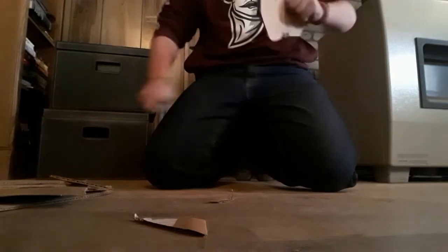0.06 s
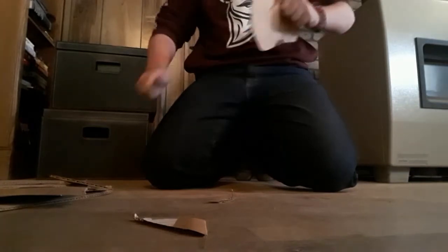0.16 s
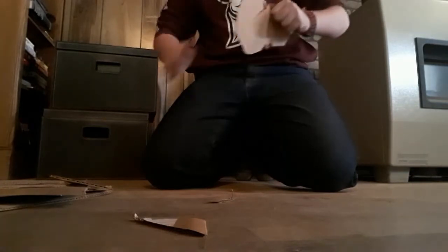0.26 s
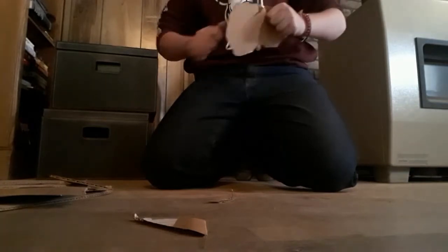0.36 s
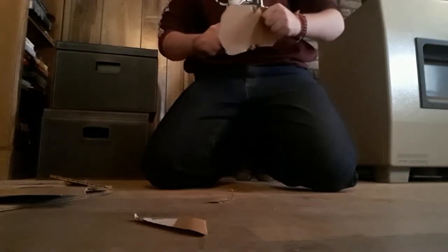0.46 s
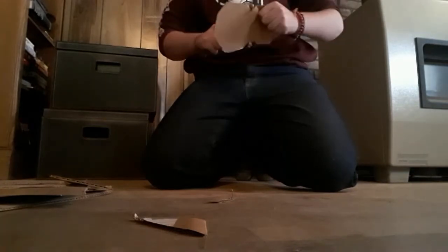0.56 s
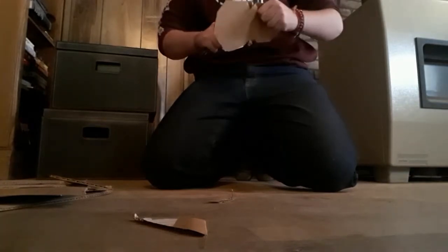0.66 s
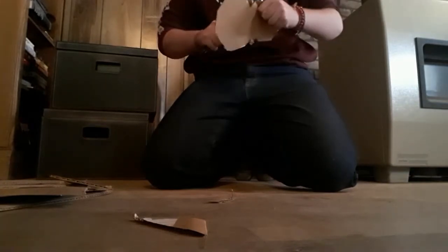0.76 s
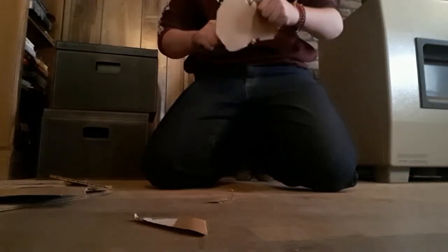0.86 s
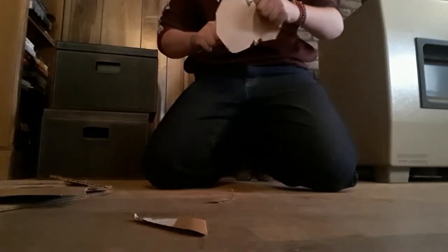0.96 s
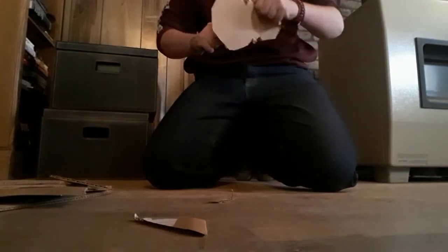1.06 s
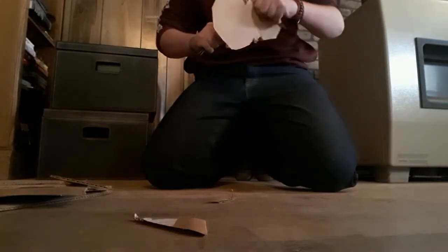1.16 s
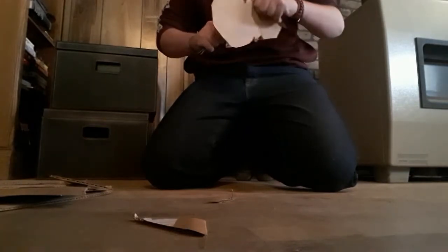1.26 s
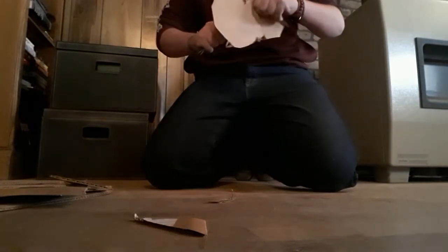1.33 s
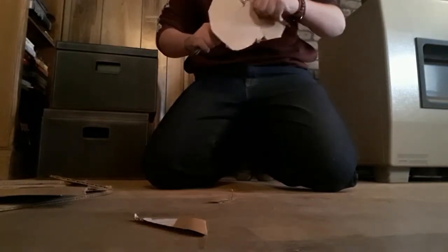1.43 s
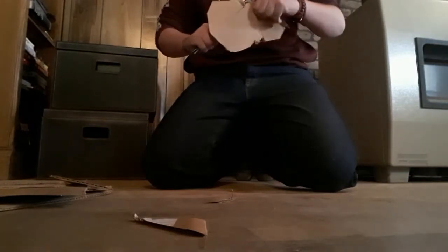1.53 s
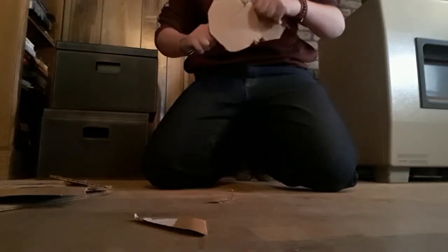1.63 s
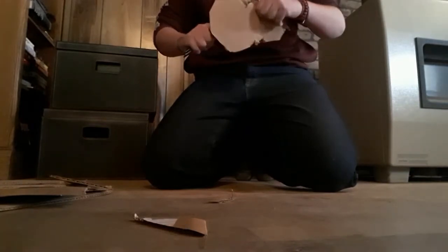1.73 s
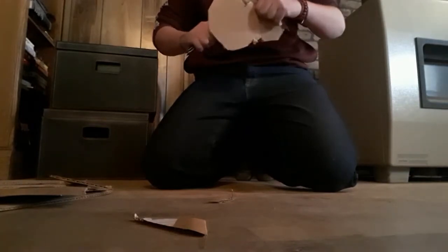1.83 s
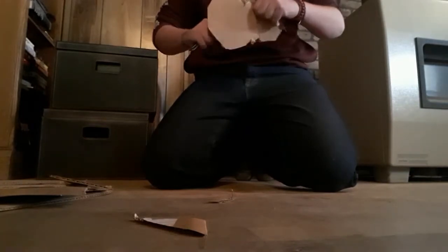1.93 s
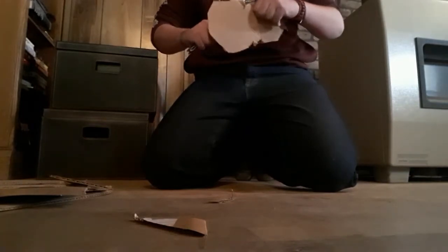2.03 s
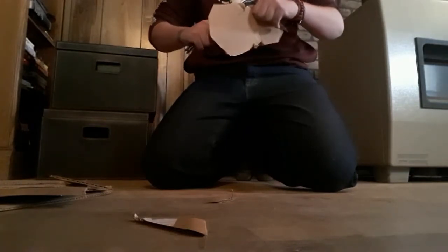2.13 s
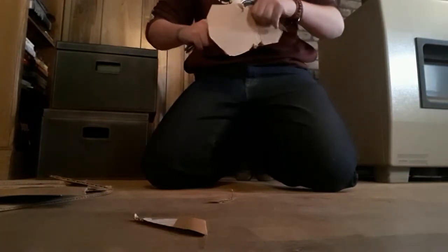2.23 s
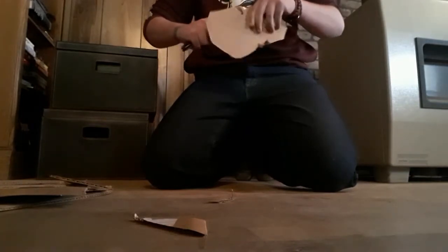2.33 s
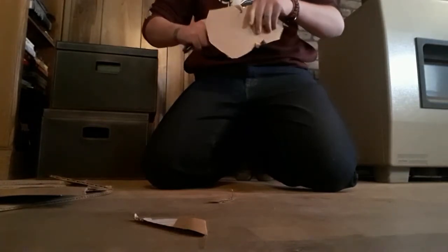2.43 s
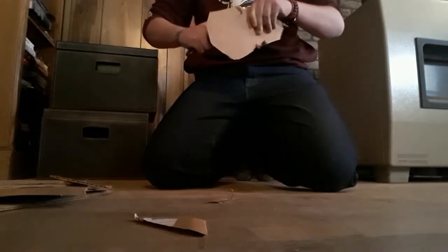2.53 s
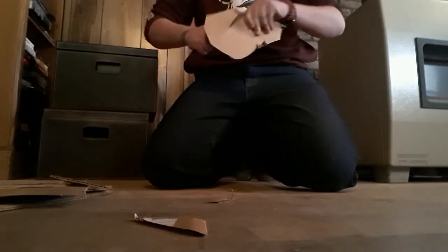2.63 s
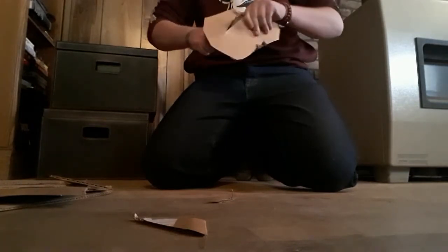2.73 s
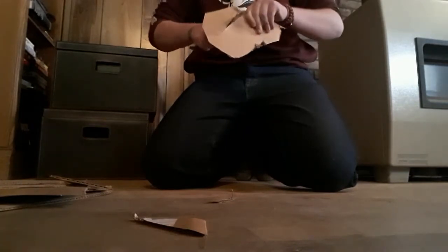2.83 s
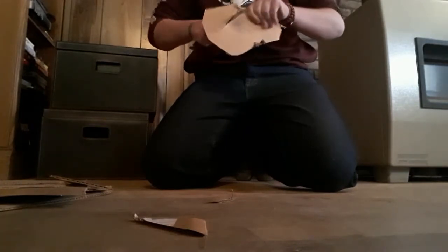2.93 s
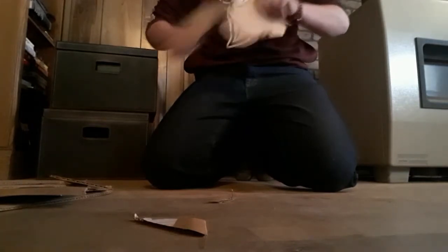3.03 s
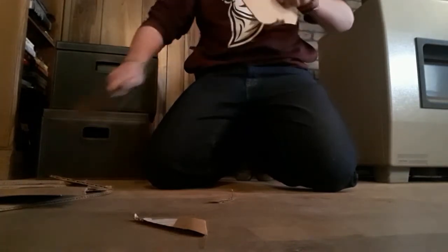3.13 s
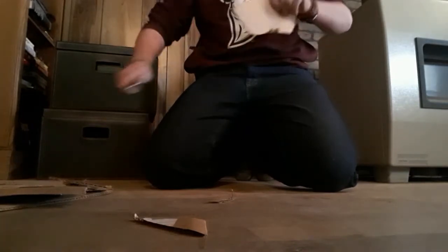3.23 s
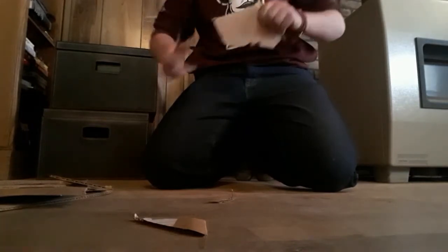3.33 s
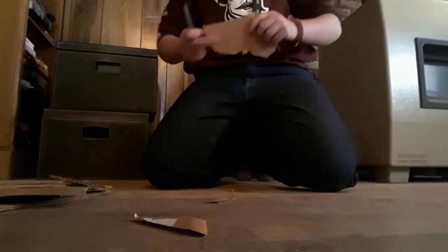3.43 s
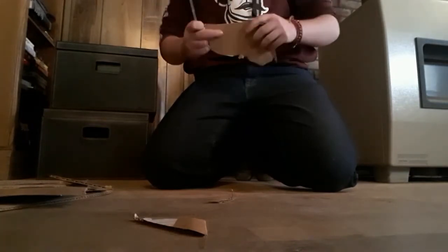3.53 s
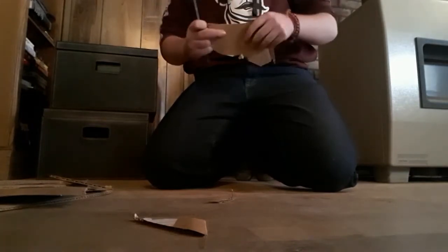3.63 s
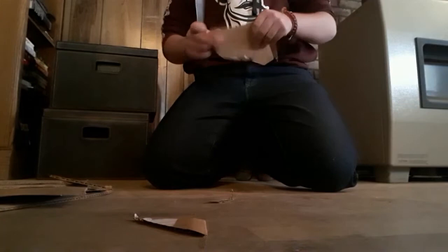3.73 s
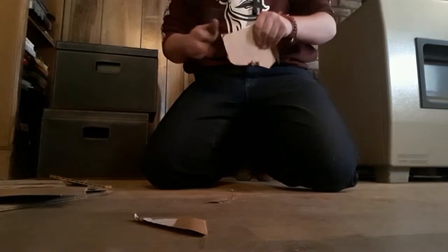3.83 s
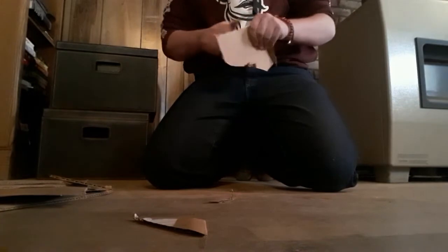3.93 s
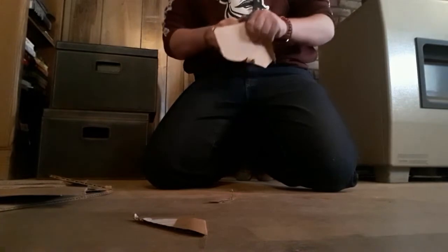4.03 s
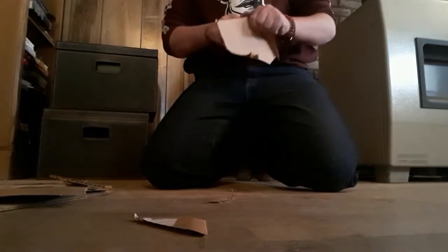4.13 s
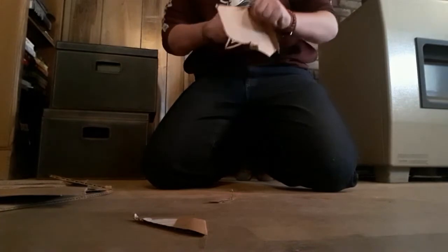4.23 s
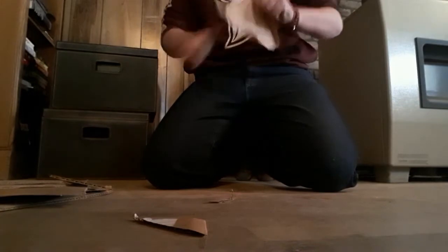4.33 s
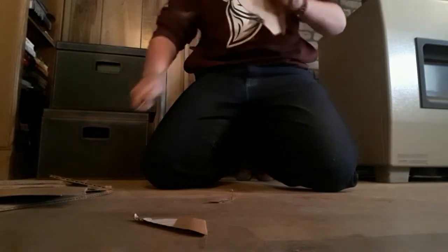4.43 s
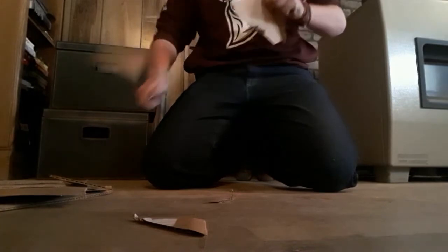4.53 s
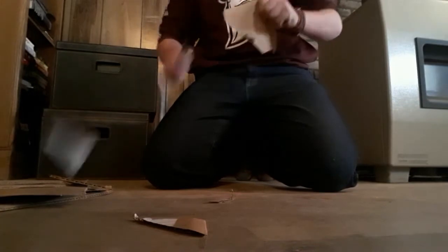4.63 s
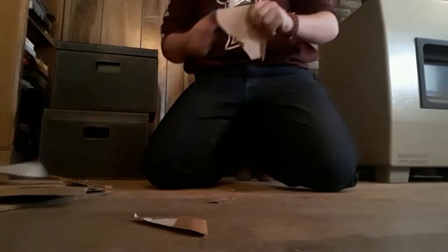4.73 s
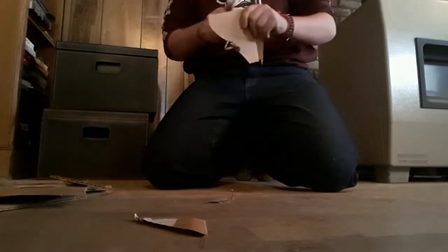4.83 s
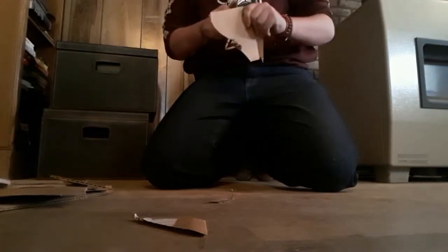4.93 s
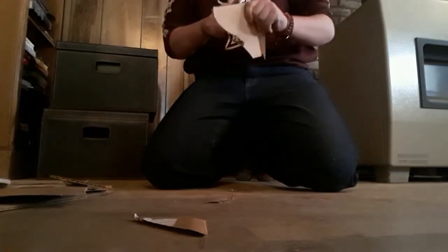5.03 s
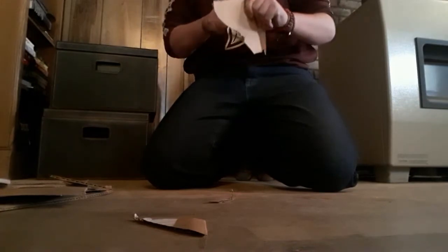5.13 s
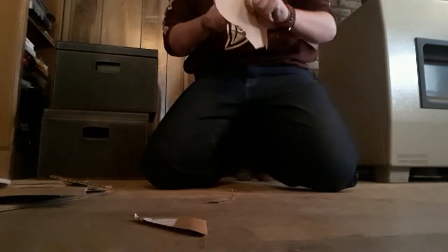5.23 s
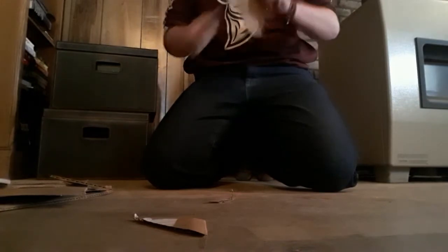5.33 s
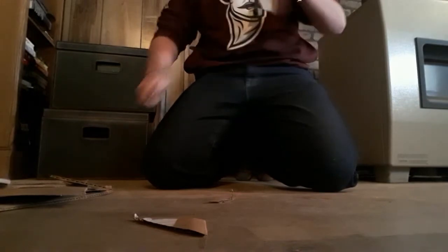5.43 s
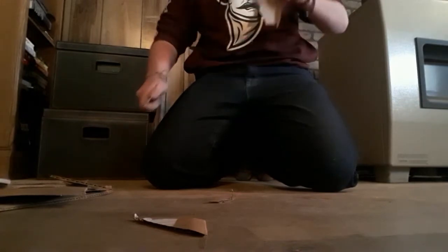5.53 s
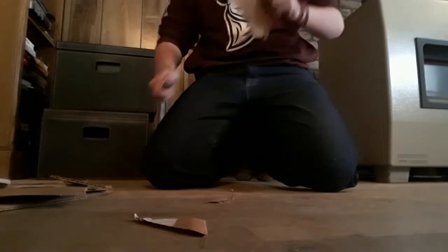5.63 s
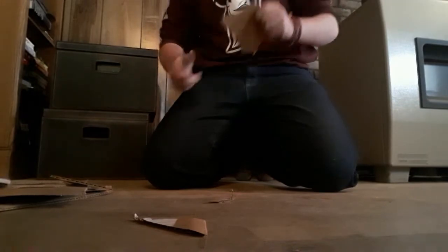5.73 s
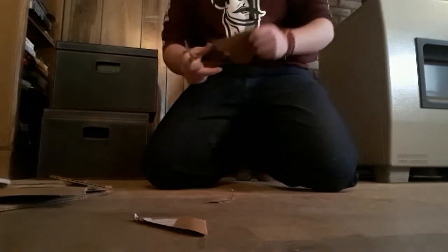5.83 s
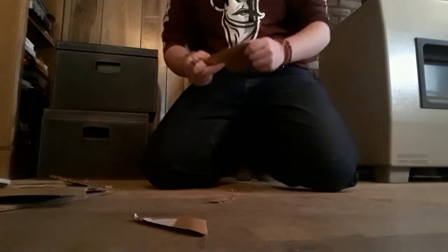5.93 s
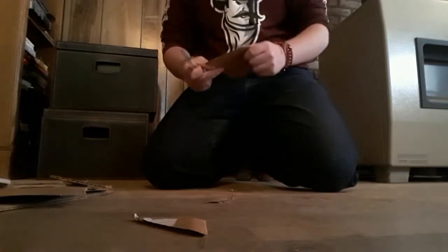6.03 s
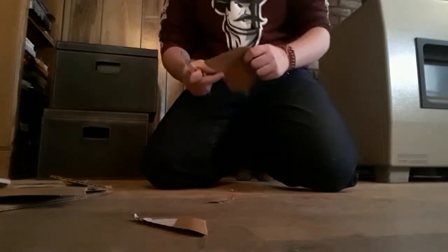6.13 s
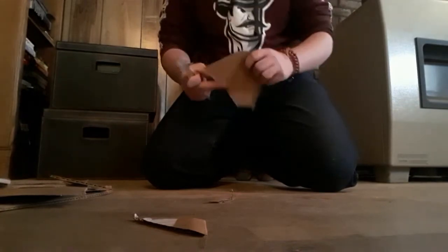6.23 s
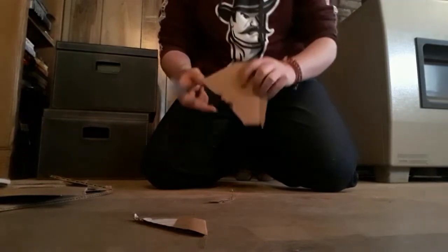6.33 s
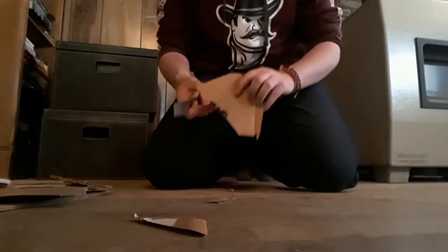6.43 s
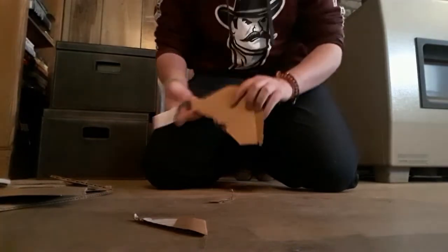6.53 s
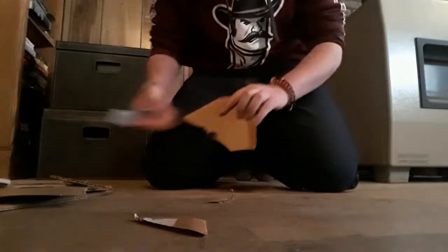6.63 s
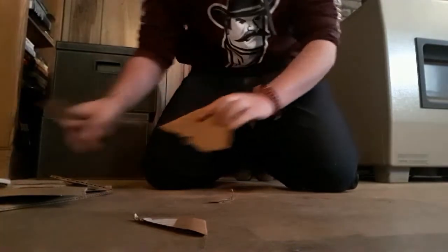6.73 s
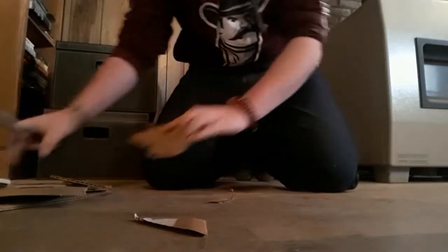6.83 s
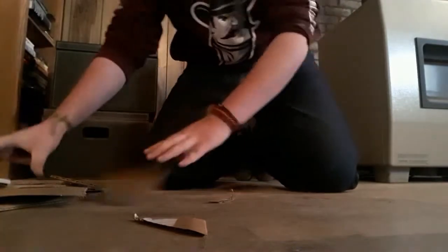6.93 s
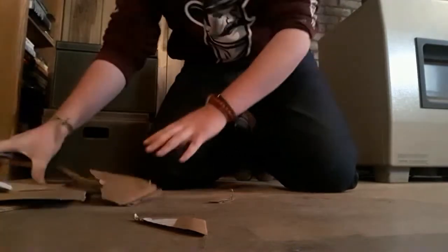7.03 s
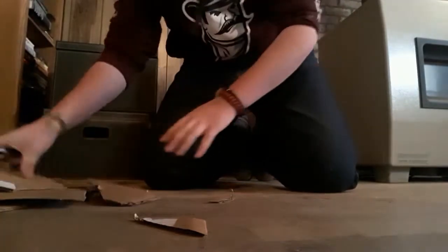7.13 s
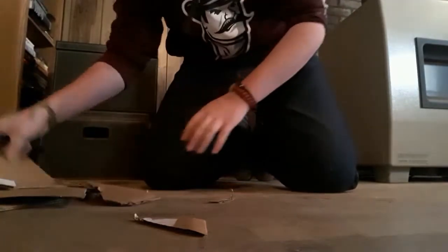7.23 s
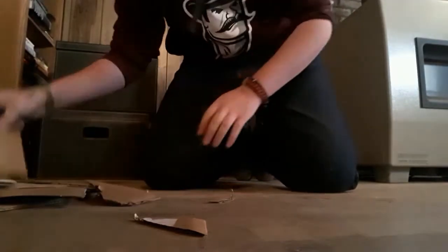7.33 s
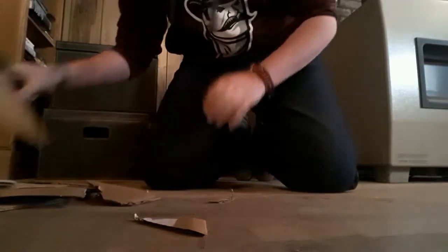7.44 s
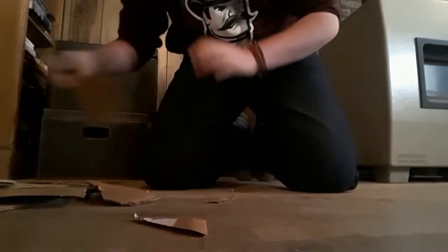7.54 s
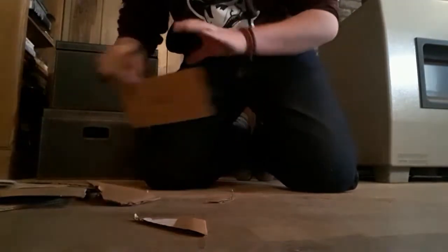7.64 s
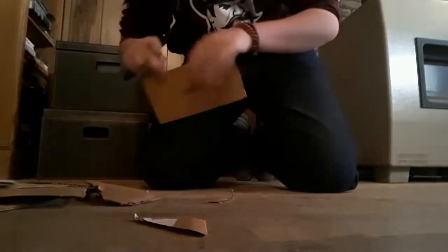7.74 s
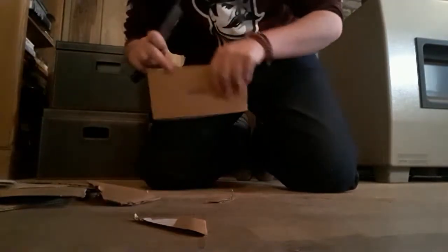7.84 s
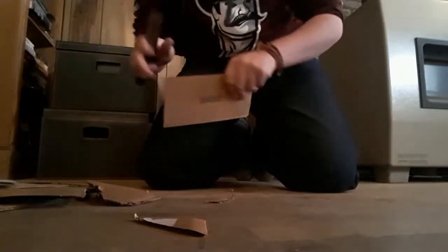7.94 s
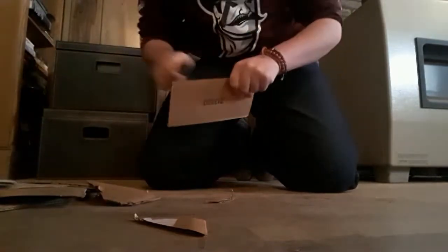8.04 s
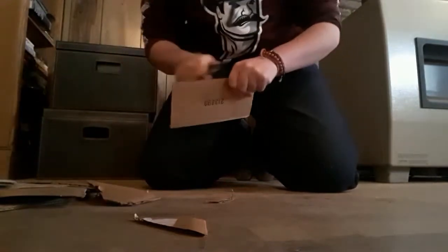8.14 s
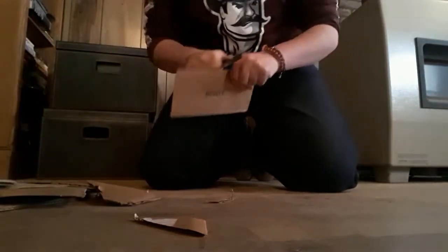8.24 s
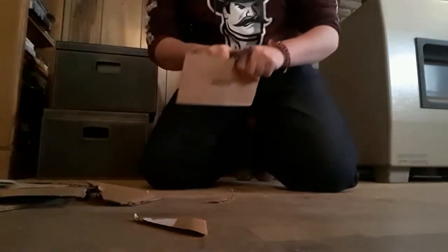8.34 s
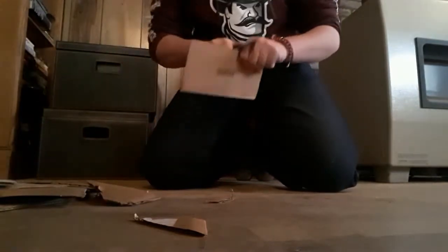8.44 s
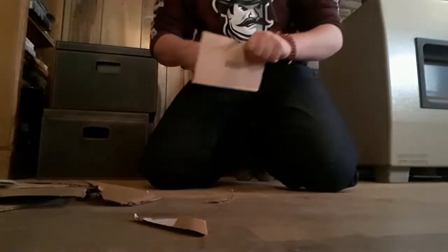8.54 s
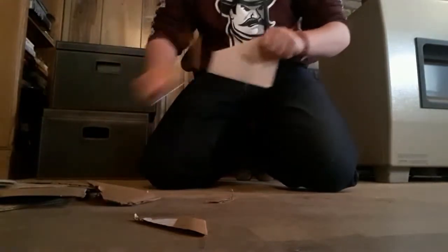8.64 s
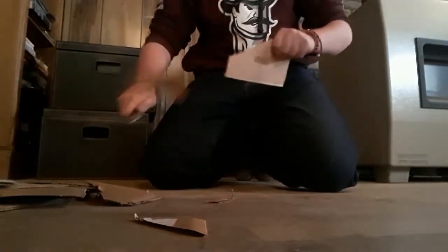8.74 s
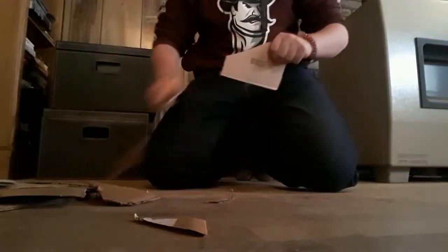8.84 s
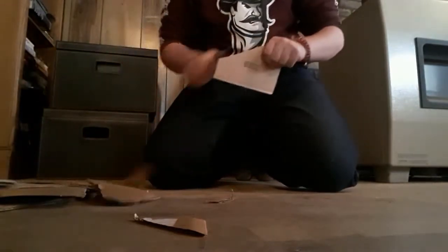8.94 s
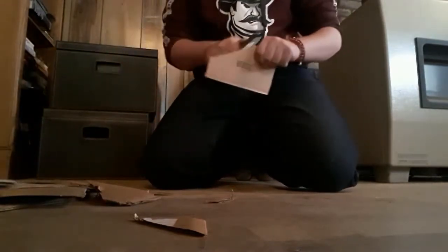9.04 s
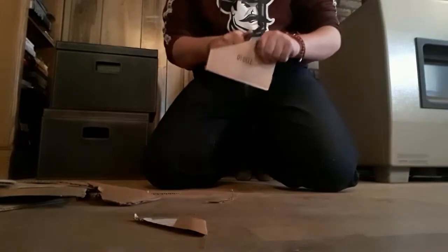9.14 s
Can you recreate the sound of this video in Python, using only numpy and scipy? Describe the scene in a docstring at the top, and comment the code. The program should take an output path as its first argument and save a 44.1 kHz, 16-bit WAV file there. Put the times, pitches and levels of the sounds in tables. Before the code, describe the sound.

In a small room, close to the microphone, a knife slices corrugated cardboard in very short ripping strokes that swell and snap free. Between cuts the sheet rubs, ticks and faintly squeaks in the hands. Cut scraps slap down on a pile to the right, one hard clack sounds near the end of the cutting, pieces slide, and a new sheet is handled and cut.

```python
"""A blade rips through corrugated cardboard in short swelling cuts; between them the sheet rubs, ticks
and squeaks in the hands, and scraps slap and slide on a pile to the right, in a small room with faint rumble.
Tearing and friction are random grains in stick-slip surges, shaped by resonances and microphone-coloured spectra.
Snaps, ticks and landings are struck modes and decaying noise; a cut ends in a damped low jerk.
Two microphone ports receive delayed, spectrally weighted direct sound and a diffuse reverberant tail."""
import sys
import numpy as np
from scipy import signal
from scipy.fft import rfft, irfft
from scipy.io import wavfile

SR = 44100
rng = np.random.default_rng(int(sys.argv[2]) if len(sys.argv) > 2 else 0)


def persist_wave(psi):
    """Save psi, clipped to +-1, as 16-bit WAV."""
    counts = np.round(np.clip(psi, -1, 1) * 32767).astype(np.int16)
    wavfile.write(sys.argv[1], SR, np.atleast_2d(counts).T)


N = 404397
TIME = np.arange(N) / SR

# Strokes of the blade; the relative levels apply as it leaves the sheet:
# start_s, length_s, swell_db, flex_db (bending sheet), flute_db (cavities), fibre_db (tearing), jerk_peak_db
STROKES = [(0.0, 0.01, -8.5, -29.5, -26.5, -28.5, -56), (2.6, 0.047, 1, -24, -26, -30.5, -41),
           (3.007, .035, 18, -25, -21, -21.5, -32.5), (4.298, .107, 9.5, -26, -20.5, -22, -31.5),
           (5.341, .058, 10.5, -23, -23, -21.5, -31.5), (8.525, 0.12, 16.5, -28.5, -15.5, -18, -34.5)]
# Bending resonances of the held sheet: centre_hz, half_width_hz (at -6 dB), relative_level_db
SHEET_MODES = [(400, 66, -12.5), (468, 137, 3.5), (658, 250, 1.5)]
# Resonances of the flute cavities: centre_hz, half_width_hz (at -6 dB), relative_level_db
FLUTE_MODES = [(1016, 250, 2), (1419, 600, 3), (1830, 1400, -21)]
# Spectrum of tearing fibres as the microphone colours it: frequency_hz, relative_level_db
FIBRES_AT_MICROPHONE = [(1200, -16.5), (2400, -23.5), (3200, -6.5), (5000, -1), (7200, -2), (9000, -10.5),
                        (10500, -5), (13000, 0.5), (16000, -3)]
# Spectrum of cardboard slapping and scraping as the microphone colours it: frequency_hz, relative_level_db
SLAP_AT_MICROPHONE = [(500, -19), (1400, 4.5), (2200, -2), (3800, -6), (5500, -7), (7500, -10.5),
                      (9200, -16), (12500, -9), (16000, -14)]


def amp(db):
    """Level definition: decibels to amplitude gain."""
    return 10 ** (np.asarray(db) / 20)


def unit(x):
    """Power normalisation: scale to rms 1."""
    return x / np.sqrt(np.mean(x ** 2))


def peak(x):
    """Amplitude normalisation: scale to peak 1."""
    return x / np.abs(x).max()


def add(track, start_s, x):
    """Superposition: mix x into the track at a given time."""
    i = max(int(start_s * SR), 0)
    track[i:i + len(x)] += x[:max(N - i, 0)]


def colour(x, spectrum, size=2048):
    """Minimum-phase filtering: a causal response that follows (hz, db) points."""
    hz, db = np.transpose(spectrum)
    f = np.maximum(np.fft.rfftfreq(size, 1 / SR), 1)
    gain = amp(np.interp(np.log(f), np.log(hz), db))
    gain = gain * np.minimum(f / hz[0], 1) * np.minimum(hz[-1] / f, 1) ** 2  # roll-off beyond both ends
    # folding the cepstrum onto positive time makes the filter causal
    cepstrum = irfft(np.log(gain))
    cepstrum[1:size // 2] *= 2
    cepstrum[size // 2 + 1:] = 0
    response = irfft(np.exp(rfft(cepstrum)))
    return signal.oaconvolve(x, response)[:len(x)]


def resonate(x, modes):
    """Modal superposition: parallel resonances, each a second-order filter applied twice."""
    out = 0
    for hz, half_width, db in modes:
        b, a = signal.iirpeak(hz, hz / (2 * half_width), SR)
        once = signal.lfilter(b, a, x)
        out = out + amp(db) * signal.lfilter(b, a, once)
    return out


def grains(rate, spread_db):
    """Random impulse process: on average rate clicks a second, of random sign and uneven size."""
    signs = rng.choice([-1, 1], N)
    sizes = amp(spread_db * np.clip(rng.standard_normal(N), -2, 2))
    return signs * sizes * (rng.random(N) < rate / SR)


def slips(rate, scatter, decay_s, depth):
    """Stick-slip: surges at uneven intervals, median 1 / rate s, that die exponentially; rms 1."""
    gaps, sizes = rng.standard_normal((4000, 2)).T
    starts = np.append(0, np.cumsum(np.exp(scatter * gaps[1:]) / rate))
    k = np.searchsorted(starts, TIME, side="right") - 1
    surge = np.exp(np.tanh(sizes[k]) - (TIME - starts[k]) / decay_s)
    return unit(1 + depth * surge)


def fall(t60, size=8192):
    """Exponential energy loss: amplitude falls 60 dB in t60 seconds."""
    return np.exp(-np.log(1000) * np.arange(size) / SR / t60)


def ring(hz, damping):
    """Impulse response of one mode whose half-width is a share of its frequency; peak 1."""
    return peak(resonate(signal.unit_impulse(4096), [(hz, damping * hz, 0)]))


def burst(t60):
    """Decaying random excitation: a dying shower of tiny contacts."""
    decay = fall(t60)
    return decay * rng.standard_normal(len(decay))


def gesture(start_s, rise_s, fall_s, edge_db, fade_s):
    """Envelope of one movement: swells from edge_db to 0 dB and back, with a fade at both ends."""
    t = TIME[:int((rise_s + fall_s + 2 * fade_s) * SR)] - fade_s
    swell = amp(np.interp(t, [0, rise_s, rise_s + fall_s], [edge_db, 0, edge_db]))
    fade = np.clip(1 + np.minimum(t, rise_s + fall_s - t) / fade_s, 0, 1)
    out = np.zeros(N)
    add(out, start_s - fade_s, swell * fade)
    return out


def gestures(table, edge_db, fade_s):
    """Superposed movement envelopes: one gain track for each level column after the three times."""
    return sum(np.outer(amp(levels), gesture(start_s, rise_s, fall_s, edge_db, fade_s))
               for start_s, rise_s, fall_s, *levels in table)


def ambience(level_db=-69.5, own_db=-6):
    """Partially correlated noise: faint room rumble, mostly shared by the ports, with some of their own."""
    # Background spectrum: frequency_hz, relative_level_db
    hum = [(15, -48), (25, -15), (43, -10), (92, -8.5), (123, -7), (200, -14), (503, -21), (887, -22.5),
           (1070, -22), (1440, -27.5), (5730, -34), (9320, -33.5), (16000, -32.5)]
    shared, left, right = (unit(colour(rng.standard_normal(N), hum)) for _ in range(3))
    return amp(level_db) * unit(shared + amp(own_db) * np.array([left, right]))


def echoes(size=18000, port_spacing_s=0.00046):
    """Diffuse-field reverberation: decaying noise whose bass is coherent between the ports."""
    # Reverberation bands: frequency_hz, t60_s, level_db re direct sound
    bands = [(100, .33, -11), (450, .31, -7), (1300, .28, -9), (3500, .31, -4), (7000, .26, -5),
             (14000, .2, -6)]
    f, t = np.fft.rfftfreq(size, 1 / SR), TIME[:size]
    likeness = np.sinc(2 * f * port_spacing_s)  # diffuse-field coherence of two spaced points
    phases = np.exp(2j * np.pi * rng.random((2, len(f))))
    mid, side = phases * np.sqrt([(1 + likeness) * size / 2, (1 - likeness) * size / 2])
    diffuse, tail = np.array([mid + side, mid - side]), 0
    band_logs = np.log([row[0] for row in bands])
    for (_, t60, db), pick in zip(bands, np.eye(len(bands))):
        band = np.interp(np.log(f + 1), band_logs, pick)
        decay = fall(t60, size=size) * np.clip(t / .0025 - 1, 0, 1)  # silent for 2.5 ms, full at 5 ms
        tail = tail + amp(db) * irfft(diffuse * band) * decay / np.linalg.norm(decay)
    return tail


def room(x, count=5):
    """Time-varying reverberation: the sheet keeps moving, so the echo pattern steps 40 times a second."""
    position = (TIME * 40).astype(int) % count
    return sum(signal.oaconvolve((x * (position == k))[None], echoes(), axes=1)[:, :N]
               for k in range(count))


def direct(x, lag_s, pan):
    """Time and level differences: the left port hears x lag_s later; pan splits its level evenly."""
    late_click = signal.unit_impulse(2048, int(abs(lag_s) * SR))
    left = colour(late_click, [(hz, db / 2) for hz, db in pan])
    right = colour(signal.unit_impulse(2048), [(hz, -db / 2) for hz, db in pan])
    return signal.oaconvolve(x[None], np.array([left, right]), axes=1)[:, :N]


def sliding(body_db=-3, hiss_db=-4):
    """Sliding friction: loose pieces scrape and bump over each other on the pile."""
    # Pieces shifting: start_s, rise_s, fall_s, body_db, hiss_db (relative levels)
    slides = [(6.995, 0.018, 0.055, -34.5, -58), (7.075, 0.057, 0.083, -37.5, -48),
              (7.19, 0.061, 0.12, -44.5, -42.5), (8.886, .01, 0.064, -45.5, -58),
              (9.0, .12, 0.033, -42, -59)]
    # Body of the loose pieces: frequency_hz, relative_level_db
    pile_spectrum = [(29, -43), (50, -38), (125, 4.5), (257, -2.5), (537, 1.5), (612, -3), (732, 3.5),
                     (1050, 0.5), (1410, 3), (1960, -13.5), (2500, -7), (3250, -12.5), (5500, -20),
                     (11000, -22)]
    body, hiss = gestures(slides, edge_db=-7.5, fade_s=0.01)
    bumps = slips(rate=35, scatter=.7, decay_s=.005, depth=1.2)
    scrape = grains(rate=6000, spread_db=6.0) * bumps
    return (amp(body_db) * body * unit(colour(scrape, pile_spectrum))
            + amp(hiss_db) * hiss * unit(colour(scrape, SLAP_AT_MICROPHONE)))


def landings(gain_db=-5):
    """Impact excitation: a scrap slaps down, flutters around its own pitch and nudges the floor."""
    # Knocks: start_s, body_peak_db (before gain_db), pitch_hz, slap_db and floor_thud_db (re body peak)
    knocks = [(3.195, -18, 1010, -5, -21), (3.221, -17, 475, -8, -26), (3.226, -12.5, 510, 0.5, -24.5),
              (3.315, -29.5, 434, 5.5, -9), (4.725, -12.5, 634, -12, -32), (4.736, -18.5, 656, -21, -22.5),
              (4.748, -11.5, 640, -7, -41), (4.838, -24, 670, -3, -29), (6.988, -38, 434.5, 3, -28),
              (7.012, -13.5, 580, -1, -11), (7.05, -20.5, 544, 6, -19), (7.117, -23, 4040, 3, -32),
              (7.295, -33, 2775, 12, -4), (8.887, -20.5, 740, -1.5, -26), (8.925, -17, 475, -4.5, -16),
              (8.993, -29.5, 580, 4.5, -4.5), (9.043, -32, 640, 15, -8), (9.107, -26.5, 426, -7, -33)]
    out = np.zeros(N)
    for start_s, db, hz, slap_db, thud_db in knocks:
        body = peak(resonate(burst(0.073), [(hz, min(.45 * hz, 450), 0)]))
        slap = peak(colour(burst(0.027), SLAP_AT_MICROPHONE))
        add(out, start_s, amp(db + gain_db) * (body + amp(slap_db) * slap))
        add(out, start_s, amp(db + gain_db + thud_db) * ring(145, damping=0.33))
    return out


def clacks():
    """Hard contact: a stiff edge on a hard face gives one brief filtered impulse."""
    # Edge impacts: start_s, peak_db
    edge_hits = [(5.9, -20.5), (5.908, -4), (7.0129, -8.5)]
    # Spectrum of the impact as the microphone colours it: frequency_hz, relative_level_db
    clack_at_microphone = [(150, -6.5), (450, -3.5), (1000, 0), (1900, 9.5), (2600, 3), (3800, -2),
                           (5500, -10.5), (7300, -6.5), (9200, -17), (12500, -16.5), (16000, -22)]
    out = np.zeros(N)
    for start_s, db in edge_hits:
        add(out, start_s, amp(db) * peak(colour(signal.unit_impulse(2048), clack_at_microphone)))
    return out


def rubbing(body_db=-3, flute_db=-3, hiss_db=-3):
    """Dry friction: skin and steel drag over ribbed paper, a patchy excitation of the sheet."""
    # Rubs: start_s, rise_s, fall_s, body_db, flute_db (cavities), hiss_db (relative levels)
    rubs = [(0.53, 0.094, 0.13, -70, -62, -60.5), (0.805, 0.005, 0.029, -43.5, -36.5, -58),
            (0.86, 0.007, .04, -47, -46.5, -47.5), (1.035, 0.017, 0.023, -61.5, -61, -60),
            (1.095, 0.0167, 0.018, -53, -55.5, -52.5), (1.315, 0.031, 0.021, -51, -48, -57.5),
            (1.375, .02, 0.036, -48, -54, -55), (1.475, 0.017, 0.043, -58, -57.5, -63),
            (1.62, 0.006, 0.076, -48, -53.5, -50), (1.828, 0.064, 0.026, -40.5, -58, -48.5),
            (2.19, 0.019, 0.046, -55.5, -57.5, -57.5), (2.26, .045, 0.07, -52, -44, -47.5),
            (2.39, 0.041, 0.047, -64, -58, -68), (2.5, 0.24, .01, -54.5, -52.5, -55),
            (2.79, 0.13, .02, -67, -49.5, -54.5), (3.445, 0.073, 0.067, -46.5, -42.5, -44),
            (3.6, 0.08, 0.22, -58.5, -52, -55), (3.772, 0.019, 0.011, -45.5, -44.5, -38.5),
            (3.92, 0.19, .06, -50.5, -41.5, -56.5), (4.245, 0.008, .03, -43, -41.5, -39.5),
            (4.88, 0.011, 0.11, -58, -43, -56), (5.02, .085, 0.1, -54.5, -58, -70.5),
            (5.283, 0.031, 0.023, -46, -45, -50), (6.13, .04, 0.107, -58.5, -68, -66.5),
            (6.265, 0.13, 0.097, -51, -48, -54.5), (6.51, 0.073, 0.029, -54, -50.5, -53),
            (6.62, 0.029, 0.32, -65.5, -63.5, -61.5), (7.82, 0.02, 0.025, -36, -38.5, -45.5),
            (7.875, 0.032, 0.024, -37, -33.5, -42), (7.93, 0.051, 0.094, -68, -40.5, -48),
            (8.09, .24, 0.033, -53.5, -53.5, -62.5), (8.365, 0.0067, 0.046, -49, -41.5, -58),
            (8.432, 0.073, 0.0058, -44.5, -40.5, -46.5)]
    # Spectrum of friction hiss as the microphone colours it: frequency_hz, relative_level_db
    hiss_at_microphone = [(1200, -43), (2500, -6), (3500, 5), (5000, 5.5), (7200, 9), (9200, 0),
                          (12500, 14.5), (16000, -1.5)]
    body, flutes, hiss = gestures(rubs, edge_db=-9, fade_s=0.0068)
    catches = slips(rate=65, scatter=.5, decay_s=.003, depth=1.1)
    drag = grains(rate=9000, spread_db=4.5) * catches
    # a soft contact shakes the sheet less in the treble
    soft = signal.sosfilt(signal.butter(2, 2400, fs=SR, output="sos"), drag)
    return (amp(body_db) * body * unit(resonate(soft, SHEET_MODES))
            + amp(flute_db) * flutes * unit(resonate(soft, FLUTE_MODES))
            + amp(hiss_db) * hiss * unit(colour(drag, hiss_at_microphone)))


def squeaks():
    """Narrow-band friction noise: thin squeals swell and fade as the grip shifts on knife and sheet."""
    # Squeals: start_s, length_s, pitch_hz, level_db (rms before the swell)
    squeals = [(3.389, 0.017, 3030, -36.5), (3.407, 0.12, 3000, -46.5), (3.497, 0.185, 3340, -61)]
    out = np.zeros(N)
    for start_s, length_s, hz, db in squeals:
        swell = np.hanning(int(length_s * SR))
        squeal = unit(resonate(rng.standard_normal(8192), [(hz, 300, 0)]))
        add(out, start_s, amp(db) * swell * squeal[:len(swell)])
    return out


def pops(table, damping, crack_t60, flex_db, flute_db, gain_db, yield_s):
    """Buckling: fibres crack, then yield_s later a wall gives a dead local ring and kicks the sheet."""
    out = np.zeros(N)
    kick = signal.unit_impulse(4096)
    sheet = (amp(flex_db) * peak(resonate(kick, SHEET_MODES))
             + amp(flute_db) * peak(resonate(kick, FLUTE_MODES)))
    for start_s, db, hz, crack_db in table:
        # soft paper gives way in under half a millisecond
        buckle = np.convolve(ring(hz, damping) + sheet, np.hanning(20))
        crack = colour(burst(crack_t60), FIBRES_AT_MICROPHONE)
        add(out, start_s + yield_s, amp(db + gain_db) * peak(buckle))
        add(out, start_s, amp(db + gain_db + crack_db) * peak(crack))
    return out


def ticking():
    """Local buckling: the sheet ticks as it is gripped and the edge bites."""
    # Ticks: start_s, peak_db (before gain_db), ring_hz, crack_db (re that peak)
    ticks = [(0.598, -43, 1590, 5.5), (1.344, -40, 1380, -15), (0.806, -32.5, 1640, -5),
             (0.821, -33, 890, 1.5), (1.481, -39, 1030, -16), (1.625, -26, 890, -15),
             (1.632, -25.5, 990, -11), (1.68, -42, 452, -13), (2.957, -23.5, 1170, -6),
             (3.356, -30, 2550, -6), (3.39, -27, 2780, -6), (3.455, -34.5, 2800, 5.5),
             (3.504, -34.5, 345, -3), (3.726, -35, 410, -18), (3.918, -31, 1470, -13),
             (3.986, -22, 1360, -21), (4.019, -24, 1184, -14), (4.037, -26, 1210, -13),
             (4.122, -27, 1064, -1.5), (4.928, -26, 614, -16), (5.105, -34.5, 990, -15),
             (5.145, -39, 676, -7.5), (6.101, -44.5, 515, 8.5), (6.392, -34, 406, -19),
             (6.454, -39, 300, 0), (6.576, -32.5, 2499, -27), (7.836, -23, 1066, -12),
             (7.908, -20, 1180, -30), (8.21, -33, 1090, -11), (8.246, -34, 1480, -15),
             (8.367, -30, 1320, -18), (8.447, -28.5, 1130, -6), (8.493, -26.5, 1280, -23),
             (8.521, -29, 1230, -4)]
    return pops(ticks, damping=0.27, crack_t60=0.035, flex_db=-14.5, flute_db=-6.5, gain_db=-2,
                yield_s=.0006)


def ribs(spread_db=2, wander_octaves=0.4, count=12):
    """Periodic impact: evenly spaced ticks of uneven size and pitch as the edge crosses the ribs."""
    # Runs: start_s, length_s, ribs_per_s, peak_db (before spread and gain), ring_hz (mid), crack_db (re peak)
    runs = [(4.141, .095, 47.5, -28, 1050, -13), (4.95, .11, 43, -39, 1300, -12)]
    rows = []
    for start_s, length_s, rate, db, hz, crack_db in runs:
        for k, (size, pitch) in enumerate(rng.uniform(-1, 1, (count, 2))):
            if k / rate < length_s:
                rib_hz = hz * 2 ** (wander_octaves * pitch)
                rows.append((start_s + k / rate, db + spread_db * size, rib_hz, crack_db))
    return rows


def ratchet():
    """Repeated buckling: each rib crossed by the edge pops in turn."""
    return pops(ribs(), damping=.6, crack_t60=.02, flex_db=-5.5, flute_db=-4.5, gain_db=-2.5,
                yield_s=.0005)


def jerks(hz=95, damping=0.91):
    """Release of stored force: the whole piece jerks in the hand as the blade comes free."""
    out = np.zeros(N)
    for start_s, length_s, *_, db in STROKES:
        add(out, start_s + length_s, amp(db) * ring(hz, damping))
    return out


def walls(count=24):
    """Sequential fracture: flute walls snap under the blade, harder as the stroke swells."""
    walls_per_s, scatter = 105, .45  # scatter as a share of the spacing
    wall_db, spread_db, crack_db = 10, 3, -6.5  # snap re the stroke's flute level, its spread, crack re snap
    low_hz, high_hz = 453, 1740
    rows = []
    for start_s, length_s, swell_db, _, flute_db, _, _ in STROKES:
        for k, (late, size, pitch) in enumerate(rng.uniform(-1, 1, (count, 3))):
            along = (k + 1 + scatter * late) / walls_per_s / length_s  # share of the stroke done
            db = flute_db + wall_db + swell_db * (along - 1) + spread_db * size
            hz = low_hz * (high_hz / low_hz) ** ((1 + pitch) / 2)
            if along < 1:
                rows.append((start_s + along * length_s, db, hz, crack_db))
    return rows


def snapping():
    """Brittle failure: the flute walls of each stroke pop, the toughest ones individually."""
    # Toughest walls: start_s, peak_db (before gain_db), ring_hz, crack_db (re that peak)
    tough_walls = [(2.607, -6, 463, -24), (2.642, -6.5, 430, -3.5), (3.038, -8, 408, 7.5),
                   (3.05, -6, 1740, -2), (4.353, -3, 1510, -9.5), (4.394, -0.5, 1470, -3),
                   (4.407, -7.5, 1100, -1.5), (5.4025, 2, 1452, -4), (8.591, -4, 1060, -4),
                   (8.647, -2, 1620, -8), (8.658, -11.5, 880, 11)]
    return pops(tough_walls + walls(), damping=0.36, crack_t60=0.0054, flex_db=-8, flute_db=0.5,
                gain_db=-7.5, yield_s=.0016)


def stroke(start_s, length_s, swell_db, attack_s=0.013, release_s=0.014):
    """Rising cutting force: the blade bites, gathers force through the sheet and is suddenly free."""
    force = amp(swell_db * (np.clip((TIME - start_s) / length_s, 0, 1) - 1))
    attack = np.clip(1 + (TIME - start_s) / attack_s, 0, 1)
    release = np.clip(1 - (TIME - start_s - length_s) / release_s, 0, 1) ** 2
    return force * attack * release


def cutting(flex_db=-3, flute_db=-3, fibre_db=-2, shudder_db=-23):
    """Source and resonator: the blade tears fibres in surges, which shake sheet and flutes."""
    swell_shares = (0.44, 1, 1)  # bending follows less of the swell than flutes and fibres
    flex, flutes, fibres = sum(
        amp(levels)[:, None] * [stroke(start_s, length_s, share * swell_db) for share in swell_shares]
        for start_s, length_s, swell_db, *levels, _ in STROKES)
    surges = slips(rate=230, scatter=.4, decay_s=.0014, depth=.9)
    tear = grains(rate=16000, spread_db=3) * surges
    shudder = unit(resonate(tear, [(155, 37, 0)]))  # the whole piece shudders in the hand
    return (amp(flex_db) * flex * unit(resonate(tear, SHEET_MODES))
            + amp(flute_db) * flutes * unit(resonate(tear, FLUTE_MODES))
            + amp(fibre_db) * fibres * unit(colour(tear, FIBRES_AT_MICROPHONE))
            + amp(shudder_db) * flutes * shudder)


def scene(pile_room_db=3, lead_in_db=4):
    """Direct plus diffuse field: the pile lies to the side, so more of the room is heard with it."""
    # Level difference of the direct sound from the hands: frequency_hz, left_minus_right_db
    hands_pan = [(60, 2), (110, -0.5), (200, -1.5), (380, -3.5), (700, -7), (1290, -2.5), (2380, -7),
                 (4400, 0.5), (8120, 6), (15000, 0)]
    # Level difference of the direct sound from the pile: frequency_hz, left_minus_right_db
    pile_pan = [(60, 0), (300, -6), (700, -4), (2000, -9), (5000, -4.5), (16000, 0.5)]
    pile = landings() + sliding() + clacks()
    knife = cutting() + snapping()
    hands = knife + jerks() + ticking() + ratchet() + rubbing() + squeaks()
    # the first cut is already ending, so the room is full of it
    lead_in = amp(lead_in_db) * knife * (TIME < .1)
    reverberant = room(hands + lead_in + amp(pile_room_db) * pile)
    return (direct(hands, lag_s=0, pan=hands_pan) + direct(pile, lag_s=.00028, pan=pile_pan)
            + reverberant + ambience())


def record(dry, low_cut_hz=62, top_hz=16000, ceiling=.7):
    """Band limiting and soft saturation: drops the deepest bass, rounds high peaks, cuts the top."""
    thinned = signal.sosfilt(signal.butter(3, low_cut_hz, "high", fs=SR, output="sos"), dry)
    rounded = ceiling * np.tanh(thinned / ceiling)
    return signal.sosfilt(signal.ellip(10, .2, 70, top_hz, fs=SR, output="sos"), rounded)


dry = scene()
out = record(dry)
persist_wave(out)
```